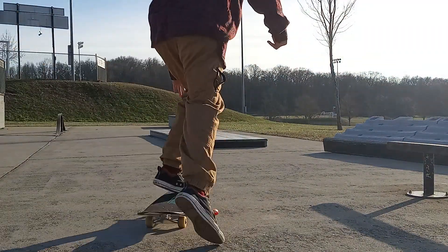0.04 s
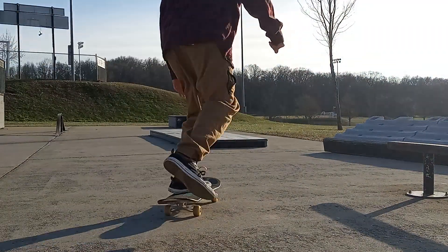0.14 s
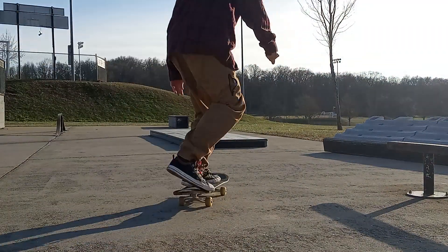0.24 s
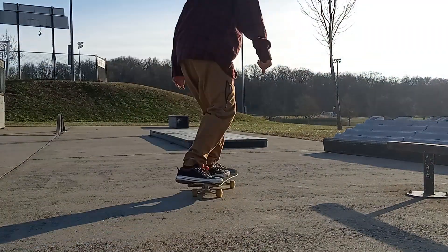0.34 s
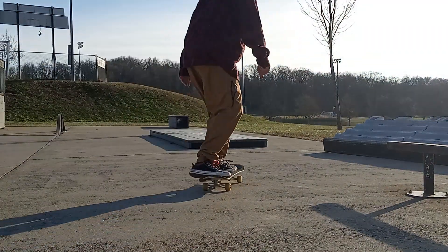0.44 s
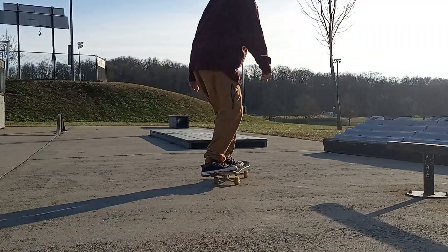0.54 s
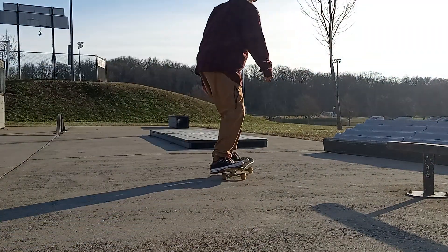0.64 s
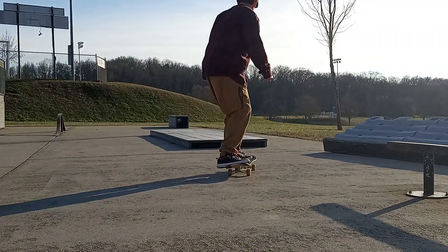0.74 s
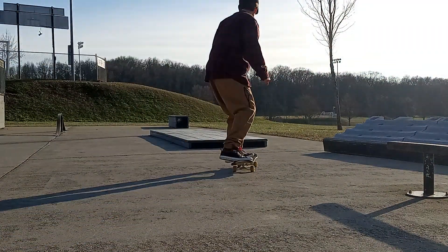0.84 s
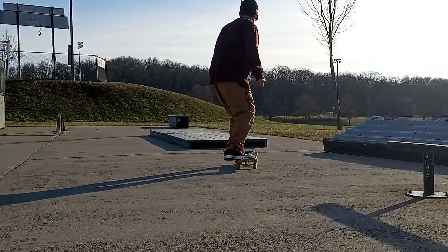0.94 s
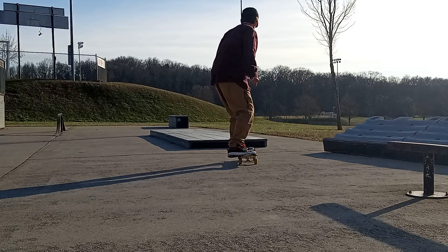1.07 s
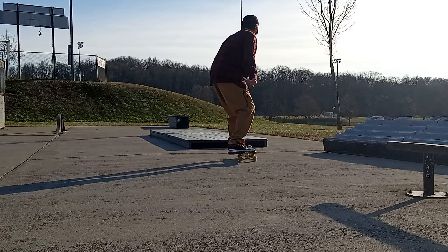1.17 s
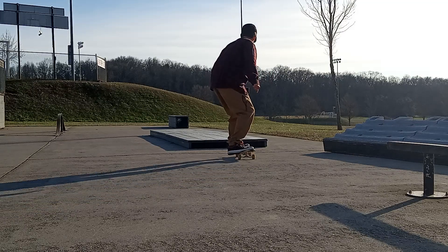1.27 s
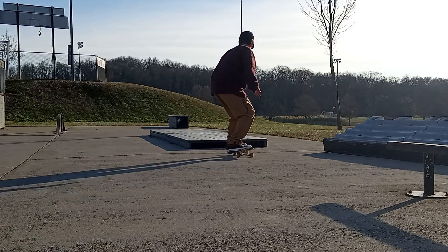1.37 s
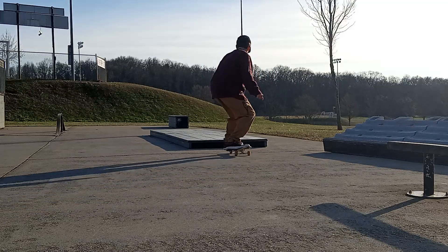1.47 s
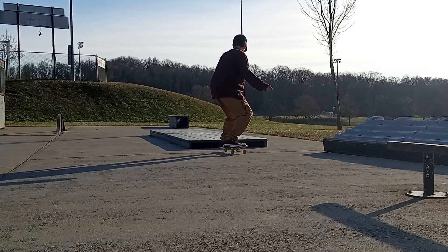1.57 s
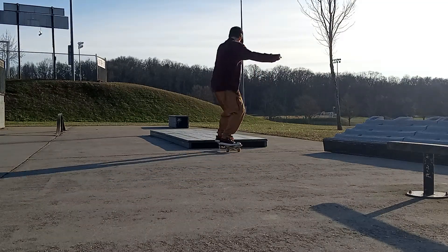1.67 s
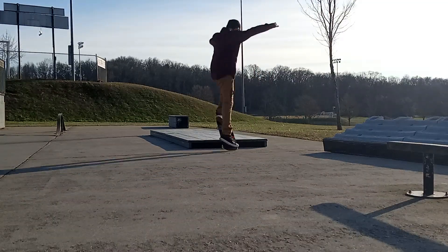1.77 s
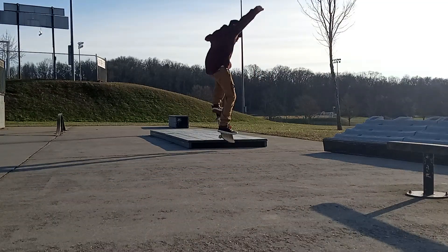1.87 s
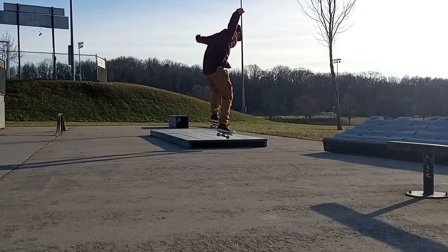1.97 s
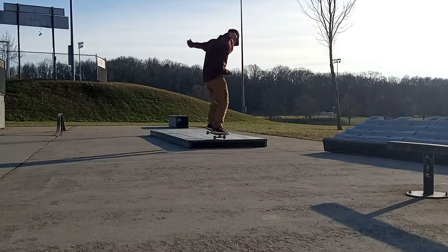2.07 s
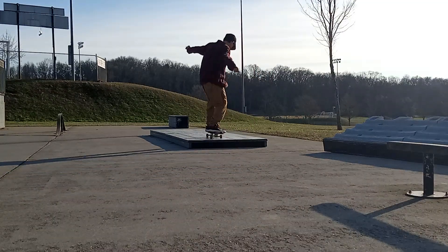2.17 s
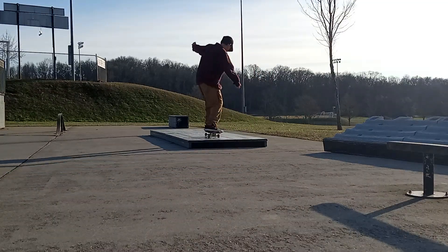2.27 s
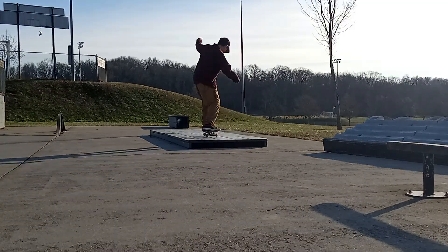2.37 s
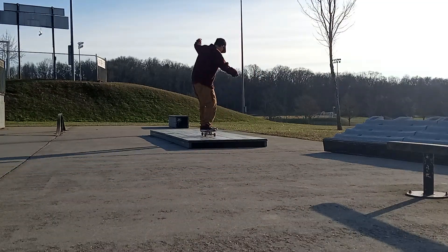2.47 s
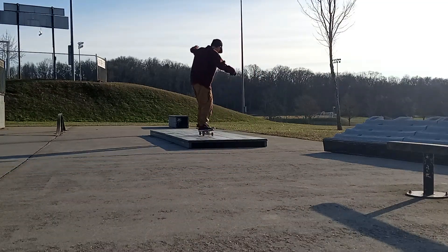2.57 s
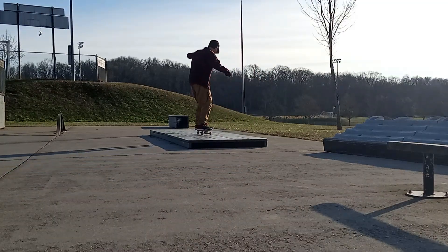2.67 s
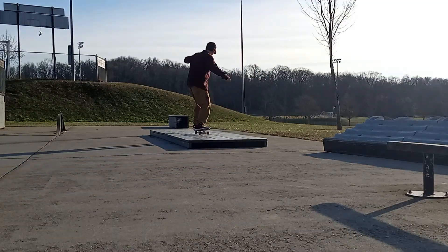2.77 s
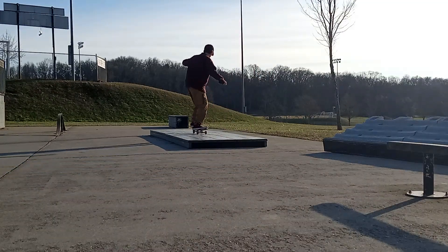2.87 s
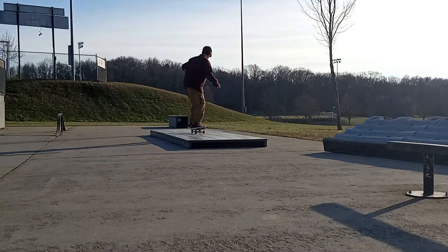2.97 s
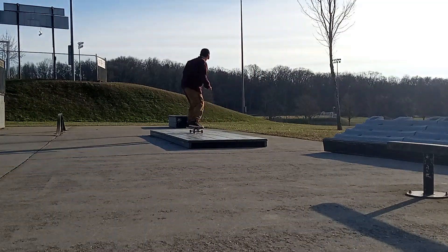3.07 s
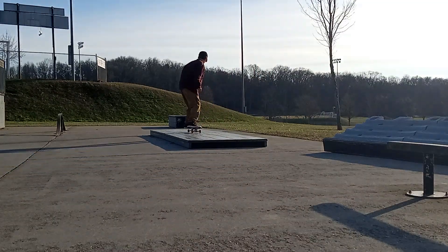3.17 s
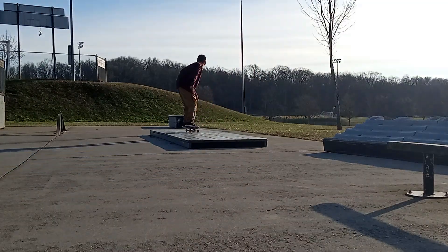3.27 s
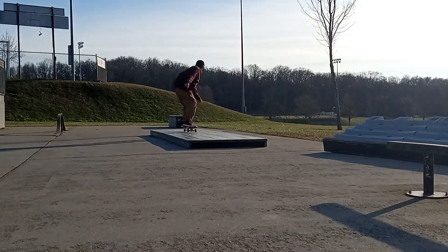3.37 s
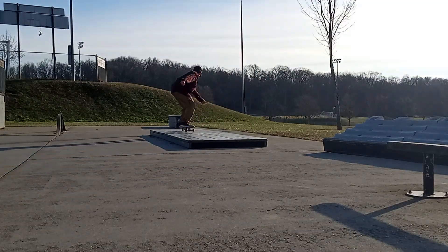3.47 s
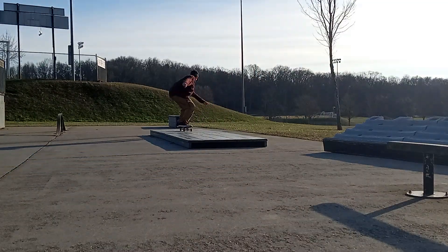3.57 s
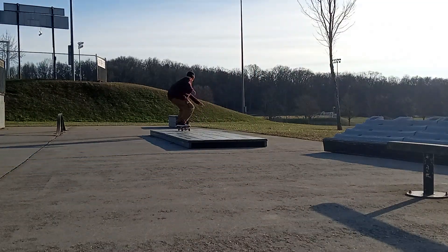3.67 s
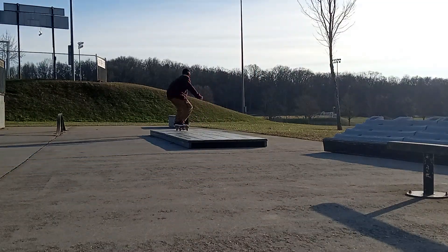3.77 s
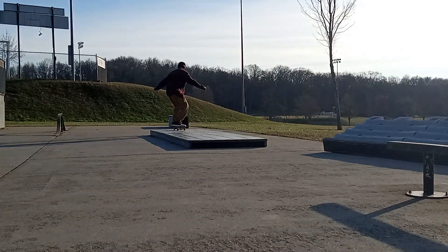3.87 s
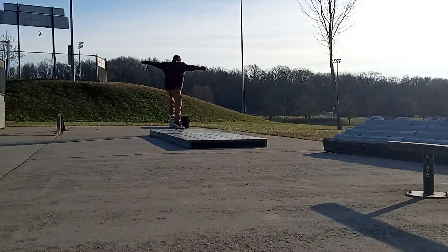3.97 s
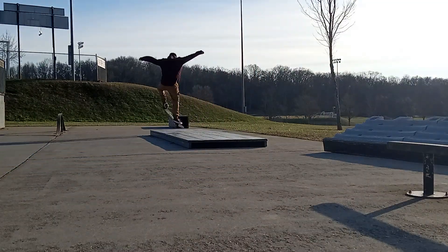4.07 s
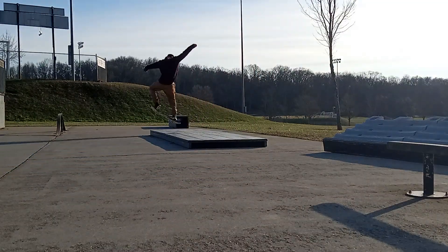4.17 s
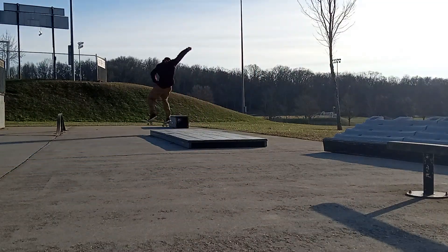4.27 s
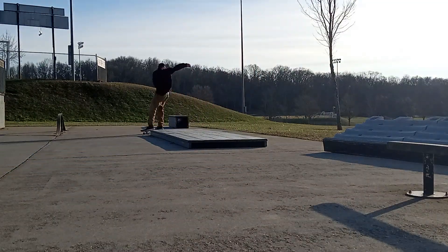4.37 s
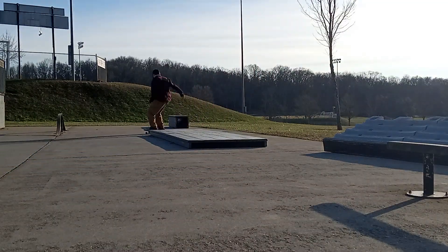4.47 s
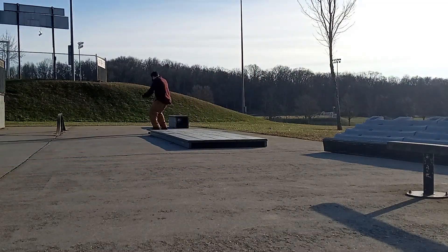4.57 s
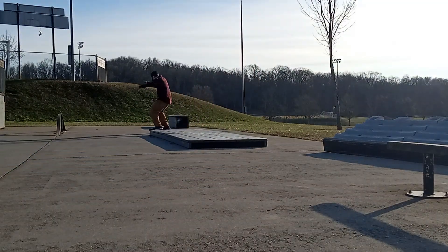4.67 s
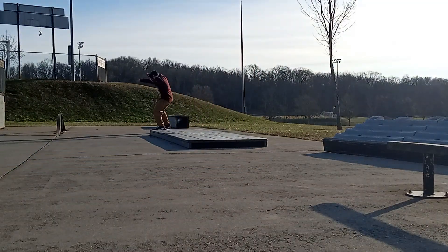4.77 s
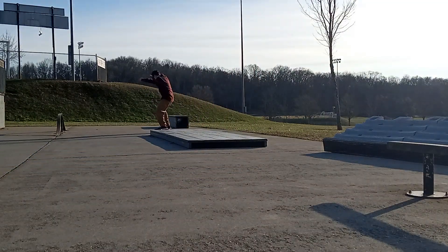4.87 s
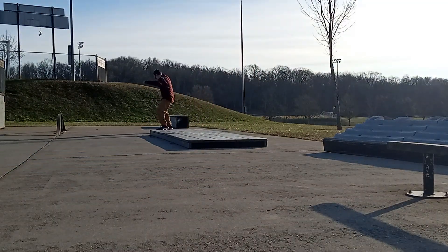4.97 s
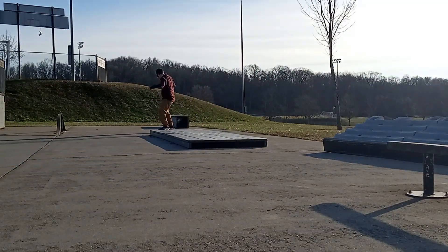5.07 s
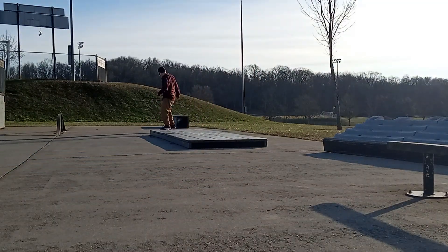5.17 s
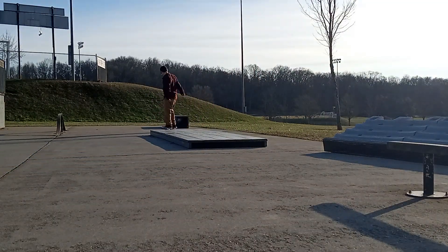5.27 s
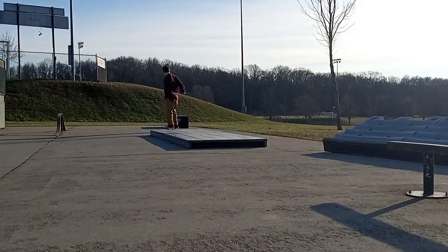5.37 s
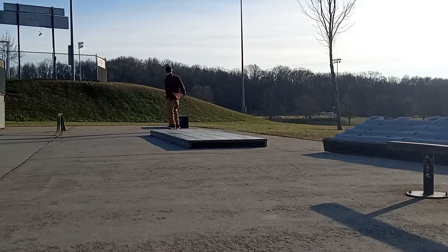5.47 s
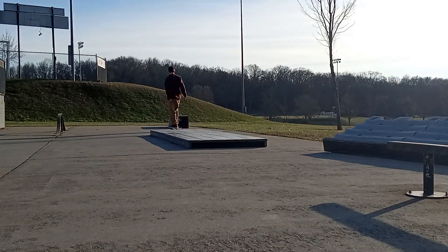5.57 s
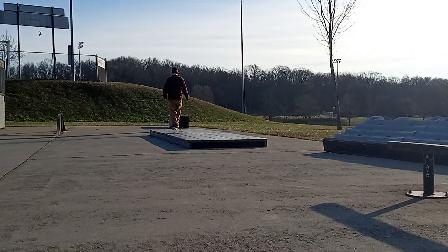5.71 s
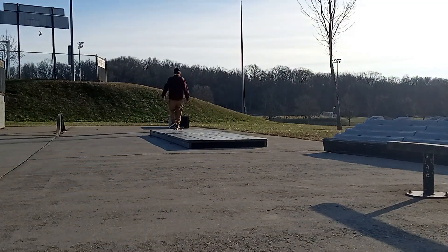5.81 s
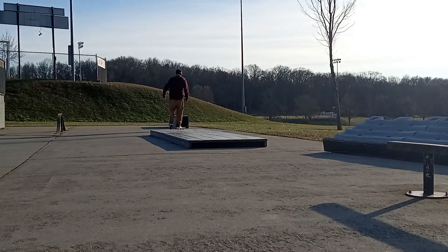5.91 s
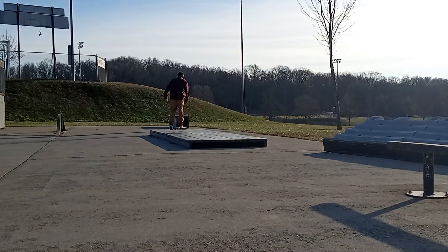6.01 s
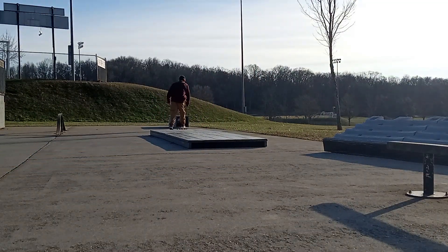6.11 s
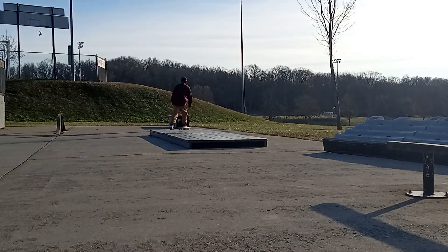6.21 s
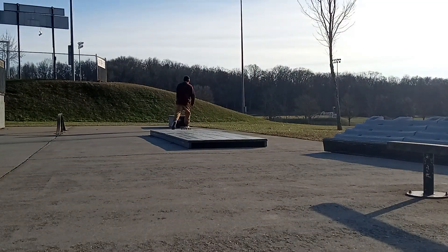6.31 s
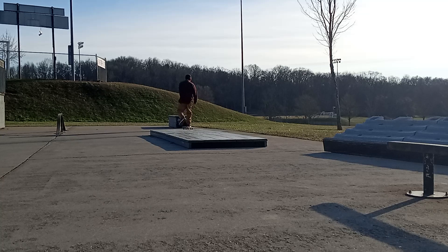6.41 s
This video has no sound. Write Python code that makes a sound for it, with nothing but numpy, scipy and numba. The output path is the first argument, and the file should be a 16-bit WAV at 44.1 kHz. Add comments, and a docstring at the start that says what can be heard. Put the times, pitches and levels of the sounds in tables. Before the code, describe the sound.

A skateboard scrapes and slams onto concrete right at the start, close and loud. Its wheels roll away with a gritty roar and whirr, strongest around 0.4 seconds. Near 1.5 seconds, soft low puffs of wind hit the microphone's left side. At 1.9 seconds the tail pops with a sharp wooden crack and a short squeaky scrape. The board lands on a hollow box at 2.1 seconds with a clack and a boom, then rumbles across, knocking over seams, with another booming hit at 3.2 seconds. A second pop comes at 4.1 seconds, and at 4.5 seconds the board lands with a rattling clatter, slightly left. Afterwards there is only faint coasting, a light clack at 5 seconds and a few small clicks until about 6.4 seconds. The skate park is open and quiet, with almost no echo and a faint rumble of distant traffic.

```python
"""An open, quiet skate park with distant traffic; a stereo microphone stands close to the skater.
He throws his board down on rough concrete, jumps on and rolls away. He pops the tail, lands on a low
hollow box, rumbles across its seams, pops off the far end and lands with a clatter.
The maple deck rings at each blow, the wheels roar and hum, the box booms and hums under them; tail,
soles and wheels scrape and squeak. One breath of wind catches the left side of the microphone."""
import sys
import numpy as np
from scipy import signal
from scipy.fft import rfft, irfft
from scipy.io import wavfile
from scipy.ndimage import uniform_filter1d, map_coordinates
from numba import njit

SR = 44100
rng = np.random.default_rng(int(sys.argv[2]) if len(sys.argv) > 2 else 0)


def master_out(mix):
    """Clip the mix to full scale and print it as 16-bit PCM to the path in sys.argv[1]."""
    frames = np.transpose(np.atleast_2d(mix))
    ceiling = np.clip(frames, -1, 1)
    pcm = np.round(ceiling * 32767).astype(np.int16)
    wavfile.write(sys.argv[1], SR, pcm)


N = 284268
TIME = np.arange(N) / SR
START_M, SPEED_M_S = 1.5, 2.5
DISTANCE_M = START_M + SPEED_M_S * TIME

# tail drag, slab, then two runs on the box, heard at 1 m: start_s, end_s, roar_db, grit_db, whirr_db
CONTACTS = [(0, 0.046, -28, -38.5, -55), (.16, 1.807, -37.5, -45.5, -42.5), (2.13, 3.05, -44, -58, -53),
            (3.2, 4.04, -43.5, -60, -54.5)]
# modes of the maple deck with its trucks: pitch_hz, level_db, relative_ring_time
DECK_MODES = [(340, -17, 3), (622.8, -6, 1.3), (906, -2.5, 0.55), (998, -9, 3.2), (1197, -1, 1),
              (1301, -3, 0.51), (1412, 2.5, 0.81), (1520, -3, 1.2), (1655, -7.5, 0.83), (1803.5, 0.5, 0.61),
              (2001, -7.5, .8), (2006, -6.5, 1.6), (2320, -1.5, 0.79), (2670, -4, .9), (3080, -14.5, 0.84),
              (3790, -15, 1.8), (3760, -19.5, 2), (3960, -17, 1), (4060, -19.5, 2.2), (4603, -26, 0.61),
              (5742, -22, .8)]
# modes of the hollow box: pitch_hz, level_db, relative_ring_time
BOX_MODES = [(99, -1.5, 0.2), (121.1, 1, 0.3), (127.6, -12.5, 0.26), (252.2, -6.5, 0.42), (260.7, -4, 0.27),
             (332.5, -10.5, 0.22), (506, -5, 0.31), (572, -8.5, 0.088), (609, -3.5, 0.13), (723, -8, 0.41),
             (782, -9, 0.12), (847, -6, 0.15), (847, 2.5, 0.085), (1011, 3, 0.11), (1120, -8, 0.14),
             (1525, -3.5, 0.12)]
# wheels striking the box: start_s, level_db, boom_db, treble_db
BOX_BLOWS = [(2.122, -25, -4.5, 2.5), (2.247, -47.5, -15, -15.5), (2.285, -51.5, -10, -4),
             (2.431, -52, 17, -9), (2.583, -39.5, 5, -3.5), (2.739, -44.5, -1, -5.5),
             (2.859, -44.5, 9.5, -9.5), (2.986, -34, -6, -10.5), (3.186, -24, -10, 2.5),
             (4.122, -48, -0.5, -10)]


def undb(db):
    """Decibels to gain."""
    return 10 ** (np.asarray(db) / 20)


def unit(x):
    """Scale to rms 1."""
    return x / np.sqrt(np.mean(x ** 2))


def unit_onset(x, ms):
    """Scale so that the first ms milliseconds have rms 1."""
    return x / np.sqrt(np.mean(x[..., :SR * ms // 1000] ** 2))


def colour(x, points, size=4096):
    """Minimum-phase filter through points of frequency_hz, gain_db."""
    hz, db = np.transpose(points)
    grid = np.maximum(np.fft.rfftfreq(size, 1 / SR), 1)
    cepstrum = irfft(np.log(undb(np.interp(np.log(grid), np.log(hz), db))))
    cepstrum[1:size // 2] *= 2
    cepstrum[size // 2 + 1:] = 0
    impulse = irfft(np.exp(rfft(cepstrum)))
    return signal.fftconvolve(x, impulse[None], axes=1)[:, :x.shape[1]]


def noise(size):
    """Noise at the two microphone ports: most alike in the low mids, less so in the treble."""
    # stereo width: frequency_hz, side_against_mid_db
    width = [(25, -1), (60, -13), (125, -17), (250, -19.5), (500, -17), (1000, -10), (2000, -9.5),
             (4000, -6), (8000, -0.5), (16000, -6)]
    mid, side = rng.standard_normal((2, 1, size))
    side = colour(side, width)
    return mid + np.vstack([side, -side])


def wander(rate_hz):
    """A smooth random curve, rms 1."""
    hold = int(SR / rate_hz)
    steps = np.repeat(rng.standard_normal(N // hold + 1), hold)
    return unit(uniform_filter1d(uniform_filter1d(steps, hold), hold)[:N])


def fade(t, t60):
    """Exponential decay, 60 dB down after t60 seconds."""
    return np.exp(-np.log(1000) * t / max(t60, .002))


def swell(s, length):
    """A smooth rise and fall around time s, 1 at the top."""
    return np.exp(-(2 * (TIME - s) / length) ** 2)


def gliding(s, length, hz, glide):
    """A pitch that passes through hz at time s, moving by glide octaves a second."""
    return hz * 2 ** (glide * np.clip(TIME - s, -length, length))


def ring(t, modes, ring_s, scatter_db):
    """Decaying modes; their sizes and signs vary by chance, as with where a blow falls."""
    sizes = undb(scatter_db * rng.standard_normal(len(modes))) * rng.choice([-1, 1], len(modes))
    return sum(size * undb(db) * fade(t, share * ring_s) * np.sin(2 * np.pi * hz * t)
               for size, (hz, db, share) in zip(sizes, modes))


def add(out, s, x):
    """Mix a sound in at time s."""
    i = max(int(s * SR), 0)
    out[:, i:i + x.shape[1]] += x[:, :N - i]


@njit
def resonance(x, hz, width_hz):
    """State-variable band-pass whose centre moves."""
    y = np.empty_like(x)
    for c in range(2):
        band_state, low_state = 0., 0.
        for i in range(x.shape[1]):
            g, damping = np.tan(np.pi * hz[i] / SR), width_hz / hz[i]
            band = (band_state + g * (x[c, i] - low_state)) / (1 + g * (g + damping))
            band_state = 2 * band - band_state
            low_state += 2 * g * band
            y[c, i] = damping * band
    return y


def narrow(x, hz, width_hz):
    """Hold a sound in one steep, moving resonance, rms 1."""
    return unit(resonance(resonance(x, hz, float(width_hz)), hz, float(width_hz)))


def mottle(x, depth_db, cell_hz, cell_s):
    """Let short-lived resonances come and go in the body of a sound, less in its treble."""
    hz, s, bins = signal.stft(x, SR, nperseg=1024)
    cells = np.meshgrid(hz / cell_hz, s / cell_s, indexing="ij")
    patches = map_coordinates(rng.standard_normal((512, 512)), cells, order=1, mode="wrap")
    body = np.interp(hz, [2400, 3600], [1, .25])[:, None]
    _, mottled = signal.istft(bins * undb(depth_db * body * unit(patches)), SR)
    return unit(mottled[:, :N])


def grounded(start, end, touch_s=0.013, lift_s=.14):
    """1 while the board touches the ground, easing off as it lifts."""
    return np.interp(TIME, [start - touch_s, start, end, end + lift_s], [0, 1, 1, 0]) ** 2


def load_db():
    """The skater bears down as he jumps on, shifts his stance and crouches to pop."""
    # weight on the wheels: middle_s, length_s, extra_load_db
    presses = [(0.397, 0.52, 12.5), (1.718, 0.085, 9), (2.912, 0.095, 2.5), (3.888, 0.03, 3),
               (4.02, 0.13, 5)]
    return sum(db * swell(s, length) for s, length, db in presses)


def contact_gains():
    """Gains of roar, grit and whirr: set by the surface, falling with distance."""
    at_1_m = sum(undb(levels)[:, None] * grounded(start, end) for start, end, *levels in CONTACTS)
    return at_1_m / DISTANCE_M


def park_air(level_db=-66.5):
    """Distant traffic rumbles unevenly under a faint, even hiss."""
    # traffic and still air: frequency_hz, level_db
    air_spectrum = [(20, -28.5), (45, -18), (80, 1.5), (110, -7), (160, -11.5), (250, -17.5), (450, -18),
                    (1000, -27.5), (1600, -27.5), (3000, -38), (5000, -39.5), (8000, -49.5), (16000, -51.5)]
    air = unit(colour(noise(N), air_spectrum)) * undb(level_db)
    rumble = colour(air, [(120, 0.5), (300, -21.5), (1000, -49.5)])
    return air + rumble * (undb(2.0 * wander(8.4)) - 1)


def wheel_roll(grain_db=2.0, grit_per_load=.65):
    """Hard wheels roar over the rough slab and crunch its grit; spinning free or far off, they rush."""
    # roar of the wheels: frequency_hz, level_db
    roar_spectrum = [(30, -38.5), (55, -23.5), (90, -13.5), (140, -8.5), (230, 1), (450, -1.5), (700, 0.5),
                     (900, -8), (1200, -5), (1600, -23.5), (2500, -27), (5000, -54.5)]
    # crunch of grit: frequency_hz, level_db
    grit_spectrum = [(700, -16.5), (1400, -4.5), (2050, -3.5), (2500, -7.5), (3200, -8.5), (4200, -4.5),
                     (6300, -12.5), (8000, -23), (12000, -19.5), (16000, -19.5)]
    # wheels spinning free or coasting far away: middle_s, length_s, level_db
    coasts = [(2.038, .2, -62.5), (3.684, 0.69, -69), (4.6, 1, -74.5), (6.28, 0.47, -76)]
    roar_gain, grit_gain, _ = contact_gains()
    roar = mottle(colour(noise(N), roar_spectrum), depth_db=4.0, cell_hz=87.13, cell_s=.035)
    grains = noise(N) * undb(grain_db * wander(700))
    grit = mottle(colour(grains, grit_spectrum), depth_db=4.5, cell_hz=159.7, cell_s=.05)
    rolling = roar_gain * undb(load_db()) * roar + grit_gain * undb(grit_per_load * load_db()) * grit
    rush = unit(colour(noise(N), [(150, -20), (450, -6.5), (620, 1.5), (800, -0.5), (1500, -4.5),
                                  (3000, -10.5), (8000, -30.5)]))
    rush_gain = sum(undb(db) * swell(s, length) for s, length, db in coasts)
    return rolling * undb(2.0 * wander(45)) + rush * rush_gain


def deck_blows(crack_db=-3, crack_t60=0.048, rattle_s=0.04, settle_s=4.525, bounce_gap_s=.0165):
    """Each blow cracks and rings the deck; trucks and bearings chatter against it and stop short."""
    # bare wood clacking, as when the tail is popped: start_s, level_db, bright_db, rattle_db
    clacks = [(.0105, -30.5, 3, -14), (1.079, -44.5, -32, -5), (1.867, -23.5, 0.5, -14),
              (1.870, -18, 1.5, -21), (1.881, -29, 2, -28), (1.928, -33.5, -4.5, -6.5),
              (4.119, -30.5, -5.5, -5.5), (4.123, -29.5, -6, -9.5), (4.153, -41, -1.5, -4),
              (4.979, -44.5, 0, -11.5), (5.479, -72, 1, -10), (5.675, -60.5, 3.5, 1),
              (5.748, -60.5, -6, -16), (5.82, -70, 1.5, -25)]
    # the board slamming down on its wheels: start_s, level_db, bright_db, rattle_db
    slams = [(.0394, -25, 7, -9), (.1583, -12.5, -1, -19.5), (.167, -27.5, 1, -12), (2.119, -22.5, -1, -12),
             (3.187, -37.5, 5.5, -11.5), (4.474, -26.5, 4.5, 2), (4.486, -19, -0.5, -5),
             (4.507, -23, 1.5, -3)]
    # trucks clicking over grit and seams: start_s, level_db, bright_db, rattle_db
    clicks = [(.107, -31, 5, -3.5), (.322, -38.5, -11, -5), (.35, -36.5, 2, -5), (.424, -34.5, 2, -9),
              (2.104, -42, 4, 4), (2.244, -48.5, -1.5, -10), (2.286, -48.5, -7, -23),
              (2.415, -53.5, -6, -18), (2.581, -36.5, -3, -12.5), (2.739, -55, 4, -17),
              (2.979, -35.5, -4.5, -11), (4.967, -54.5, 5, 6), (6.235, -62.5, 5.5, 0)]
    # the deck's dense overtones: frequency_hz, level_db
    crack_spectrum = [(60, -25.5), (200, -8.5), (600, 0.5), (1400, -5.5), (2300, -2), (3100, -8),
                      (4200, -10), (6000, -17), (8000, -29), (12000, -27.5), (16000, -29.5)]
    # after the last landing the board settles in quick, weakening bounces
    bounces = [(settle_s + k * bounce_gap_s, -35 - 1.1 * k, 0, -6) for k in range(3)]
    # the tail clacks, loaded wheels thud, trucks sizzle: blows, bass_db, treble_db, sizzle_db, ring_s
    kinds = [(clacks, -13.5, 0.5, -15, 0.0261), (slams, 5, 1, 2, 0.032),
             (clicks + bounces, 3.5, -3, 0.5, 0.03)]
    out, t = np.zeros((2, N)), np.arange(SR // 5) / SR
    for blows, bass_db, treble_db, sizzle_db, ring_s in kinds:
        for s, db, bright_db, rattle_db in blows:
            modes = unit_onset(ring(t, DECK_MODES, ring_s, scatter_db=6), ms=10)
            crack = unit_onset(colour(noise(len(t)) * fade(t, crack_t60), crack_spectrum), ms=10)
            chatter = noise(len(t))
            ringing = signal.fftconvolve(chatter, modes[None], axes=1)[:, :len(t)]
            rattle = unit(unit(colour(chatter, crack_spectrum)) + unit(ringing))
            rattle *= np.exp(-(t / rattle_s) ** 2)
            blow = modes + undb(crack_db) * crack + undb(rattle_db) * rattle
            # a thin deck gives little deep bass
            tone = [(250, -9.5), (560, bass_db), (1400, 1.5), (2300, 0.0), (4000, treble_db + bright_db),
                    (6000, treble_db + bright_db), (8500, sizzle_db + bright_db)]
            add(out, s, undb(db) * unit_onset(colour(blow, tone), ms=10))
    return out


def scrapes(grain_db=3, waver=0.055, flutter_db=4, rub_db=-3):
    """Tail, soles and wheels stick and slip in short strokes: a dry scrape with a wavering squeak."""
    # squeaks and scrapes: middle_s, length_s, pitch_hz, glide_octaves_per_s, level_db
    strokes = [(0.012, 0.014, 1830, 1, -23.5), (.021, 0.017, 933, 0, -29.5), (0.074, 0.14, 2200, -1, -45),
               (1.862, 0.048, 2280, 0.5, -41), (1.936, 0.07, 2150, -0.5, -43.5),
               (1.999, 0.039, 2415, -0.5, -57.5), (2.666, 0.071, 2300, 3.5, -55),
               (2.994, 0.035, 2250, -0.5, -46.5), (4.023, .05, 2250, -0.5, -63),
               (4.29, .04, 2800, 0.5, -72.5), (4.368, 0.11, 3950, 0.5, -79),
               (4.67, 0.082, 2300, -0.5, -74.5), (5.693, .05, 2400, -2, -69),
               (6.13, 0.043, 3530, 0.5, -78.5)]
    # the dry scrape: frequency_hz, level_db
    rub_spectrum = [(200, -24), (900, -9), (1600, -7.5), (2250, 1.5), (2650, 0.5), (3100, -20.5),
                    (4200, -16), (8000, -32), (16000, -39)]
    rub = unit(colour(noise(N) * undb(grain_db * wander(400)), rub_spectrum))
    unsteady = 1 + waver * wander(600)
    flutter = unit(undb(flutter_db * wander(150))) * np.sqrt(2)
    out = np.zeros((2, N))
    for s, length, hz, glide, db in strokes:
        slips = np.cumsum(gliding(s, length, hz, glide) * unsteady) / SR
        squeak = flutter * np.sin(2 * np.pi * slips)
        out += undb(db) * swell(s, length) * (squeak + undb(rub_db) * rub)
    return out


def hums_and_whirr(hum_width_hz=110, whirr_width_hz=150, swell_db=4.0, drift=0.034):
    """Wheels and hollow box give low hums; the middle modes of the deck whirr, swelling and drifting."""
    # low hums of the wheels and the hollow box: middle_s, length_s, pitch_hz, glide_octaves_per_s, level_db
    low_hums = [(.03, 0.054, 368.6, 0, -35), (0.277, 0.17, 130, 2, -43), (0.307, 0.37, 735, -1.06, -44),
                (0.638, 0.18, 512, -0.54, -35), (0.818, 0.18, 239, 0, -45), (0.924, .14, 620, -0.68, -48),
                (1.044, 0.075, 257, 0.44, -43.5), (1.738, 0.035, 340, 0, -42), (4.018, .1, 258, 0, -48.5),
                (6.26, 0.29, 636.7, 0.73, -67.5)]
    roughness = noise(N)
    hums = sum(undb(db) * swell(s, length) * narrow(roughness, gliding(s, length, hz, glide), hum_width_hz)
               for s, length, hz, glide, db in low_hums)
    whirr = sum(undb(db + swell_db * wander(28))
                * narrow(roughness, hz * (1 + drift * wander(4.6)), whirr_width_hz)
                for hz, db, _ in DECK_MODES[4:12])
    *_, whirr_gain = contact_gains()
    poised = undb(6 * swell(s=1.25, length=0.74))  # more whirr while he stands poised on the deck
    return hums + whirr_gain * poised * unit(whirr)


def bumps(rise_s=0.0076, pitch_hz=99.34):
    """Soft, low thumps a few cycles long."""
    # low thuds: start_s, level_db, left_minus_right_db
    thuds = [(.039, -40, 0), (.162, -29.5, .5), (1.411, -39.5, 19), (1.575, -38, 11), (1.66, -44.5, 8.5),
             (1.797, -41, 13.5), (5.979, -56, -1.5)]
    knock_spectrum = [(25, -30.0), (55, -11), (100, 13.0), (300, -5.5), (700, -21.5), (3000, -50)]
    out, t = np.zeros((2, N)), np.arange(SR // 5) / SR
    push = t / rise_s * np.exp(1 - t / rise_s)
    for s, db, pan_db in thuds:
        knock = unit(colour(noise(len(t)), knock_spectrum))
        gains = undb(db + np.array([[pan_db], [-pan_db]]) / 2)
        add(out, s, gains * push * (np.sin(2 * np.pi * pitch_hz * t) + 0.5 * knock))
    return out


def gust(level_db=-52.5, pan_db=13.5, buffet_db=6):
    """Wind buffets the microphone in uneven low puffs, mostly at the left port."""
    wind = colour(noise(N), [(25, -20), (55, -8), (90, 1), (140, -10), (300, -28.5), (1000, -54)])
    puffs = unit(wind * undb(buffet_db * wander(24)))
    gains = undb(level_db + np.array([[pan_db], [-pan_db]]) / 2)
    return gains * swell(s=1.65, length=0.98) * puffs


def box_booms(dense_db=-1.5, dense_t60=0.21, axle_lag_s=0.01012):
    """Landings and seams set the hollow box booming, one axle after the other."""
    # the box's dense overtones: frequency_hz, level_db
    boom_spectrum = [(30, -68), (55, -23), (85, 4), (130, -7.5), (185, -9), (245, -4), (400, -9),
                     (900, -2.5), (1350, -20.5), (2200, -37), (6000, -69.5)]
    out, t = np.zeros((2, N)), np.arange(SR // 2) / SR
    second_axle = np.array(BOX_BLOWS) + [axle_lag_s, -2.5, 7, -20]  # later, softer and duller
    for s, db, boom_db, treble_db in [*BOX_BLOWS, *second_axle]:
        modes = unit_onset(ring(t, BOX_MODES, ring_s=0.68, scatter_db=6.5), ms=30)
        dense = unit_onset(colour(noise(len(t)) * fade(t, dense_t60), boom_spectrum), ms=30)
        tone = [(40, -25.5), (90, boom_db), (400, 1.5), (900, treble_db)]
        blow = colour(modes + undb(dense_db) * dense, tone)
        add(out, s, undb(db) * unit_onset(blow, ms=30))
    return out


def box_drumming(at_1_m_db=-37.5, drum_per_load=3.05, uneven_db=2, shake_db=-17, shake_t60=0.76):
    """Rolling wheels keep the lowest modes of the box going, more under load and after each blow."""
    t = np.arange(SR // 2) / SR
    roughness = noise(N)
    modes = ring(t, BOX_MODES, ring_s=0.39, scatter_db=0.5)
    top = signal.fftconvolve(roughness, modes[None], axes=1)[:, :N]
    top = colour(top, [(50, -23), (100, -5.5), (140, 7.0), (190, -5.5), (260, 0.5), (400, -18.0),
                       (900, -21.5), (2000, -39.0)])
    on_box = sum(grounded(start, end) for start, end, *_ in CONTACTS[2:])
    rolling = on_box * undb(at_1_m_db + drum_per_load * load_db() + uneven_db * wander(14)) / DISTANCE_M
    shaking = sum(undb(db + shake_db) * (TIME > s) * fade(np.abs(TIME - s), shake_t60)
                  for s, db, *_ in BOX_BLOWS)
    return unit(top) * np.hypot(rolling, shaking)


def at_microphone(x, lead_samples=2.6, pan_db=1.2):
    """Sound reaches the port on the skater's side sooner and a little louder."""
    # the skater's path: time_s, bearing (-1 right to 1 left)
    path = [(0, 0.36), (.6, -0.029), (1.4, -0.44), (1.9, -0.079), (2.5, .1), (3.2, -0.02), (4.1, 0.69),
            (4.5, 0.96), (6.45, 0.74)]
    bearing = np.interp(TIME, *np.transpose(path))
    return np.array([undb(pan_db * lean) * map_coordinates(port, [np.arange(N) + lead_samples * lean])
                     for port, lean in zip(x, (bearing / 2, -bearing / 2))])


def ramp_echo(x, wet_db=-24, reach_s=0.07):
    """Nearby ramps and ledges scatter a short echo; under the open sky nothing follows it."""
    t = np.arange(SR // 4) / SR
    scatter = rng.standard_normal((2, len(t))) * np.exp(-(t / reach_s) ** 2) * (t > .008)
    tail = colour(scatter, [(100, -7.5), (800, -1.5), (3000, -4), (10000, -8.0)])
    tail /= np.sqrt(np.sum(tail ** 2) / 2)
    return undb(wet_db) * signal.fftconvolve(x, tail, axes=1)[:, :N]


def scene():
    """The skater rolls away from the microphone through the quiet park."""
    skate = (deck_blows() + box_booms() + box_drumming() + wheel_roll()
             + hums_and_whirr() + bumps() + scrapes())
    return at_microphone(skate) + ramp_echo(skate) + gust() + park_air()


def record(dry):
    """The microphone port rings at the very top, then the recorder cuts off above 15750 Hz."""
    # response of the port: frequency_hz, gain_db
    port_response = [(20, -2), (13300, -4), (14400, 0.5), (15300, 6), (16000, 3)]
    low_pass = signal.ellip(10, .2, 70, 15750, fs=SR, output="sos")
    return signal.sosfilt(low_pass, colour(dry, port_response))


dry = scene()
out = record(dry)
master_out(out)
```